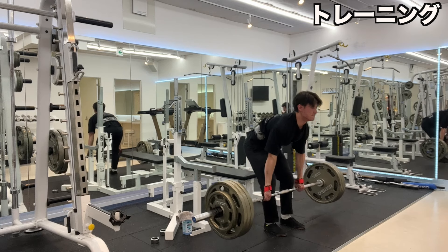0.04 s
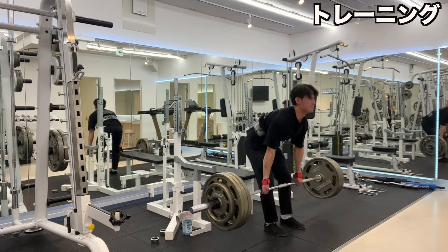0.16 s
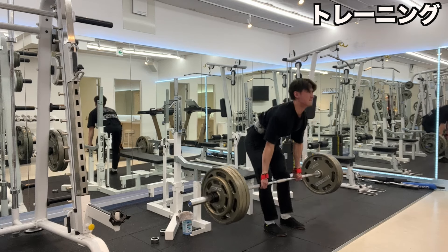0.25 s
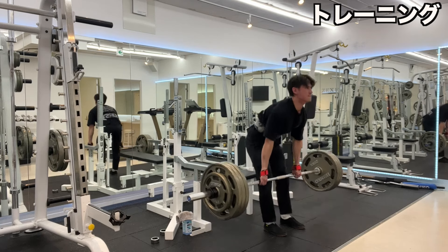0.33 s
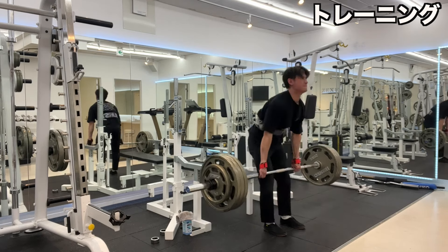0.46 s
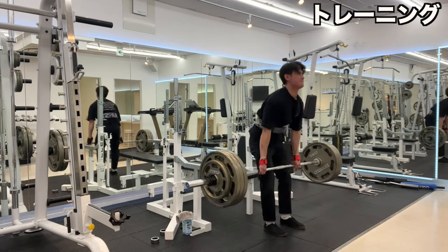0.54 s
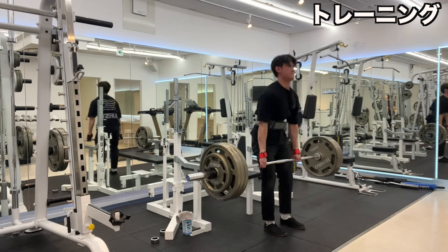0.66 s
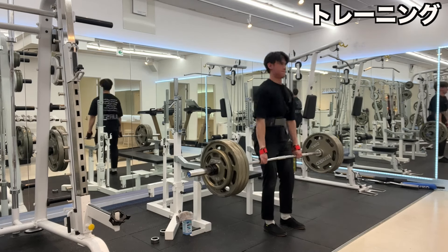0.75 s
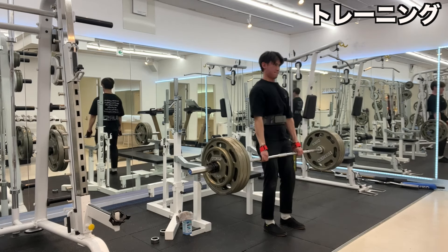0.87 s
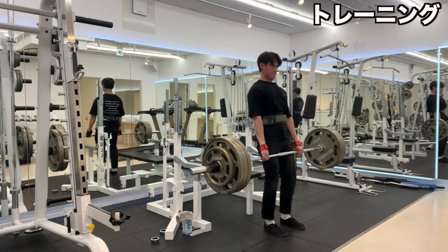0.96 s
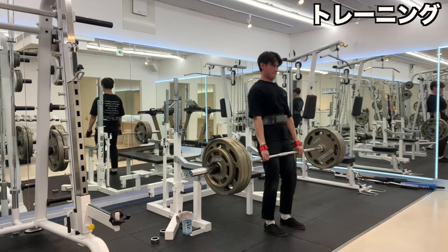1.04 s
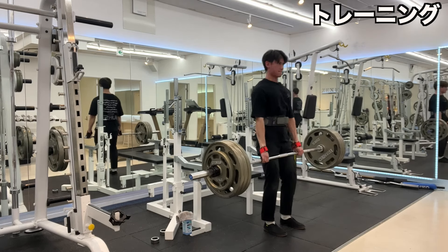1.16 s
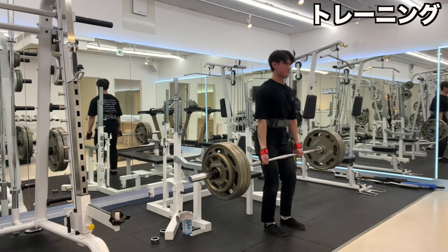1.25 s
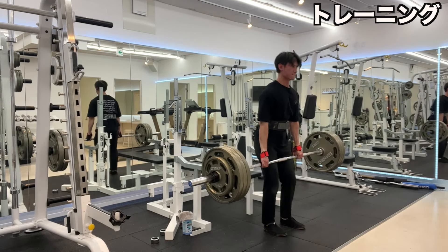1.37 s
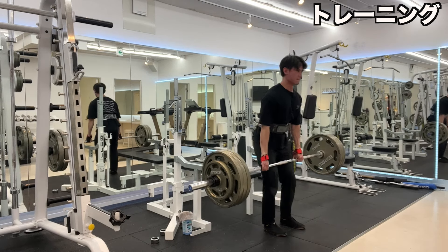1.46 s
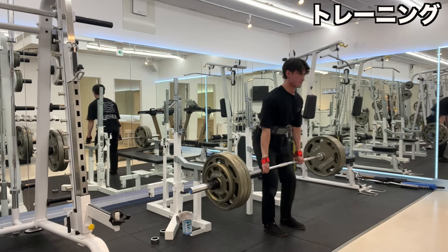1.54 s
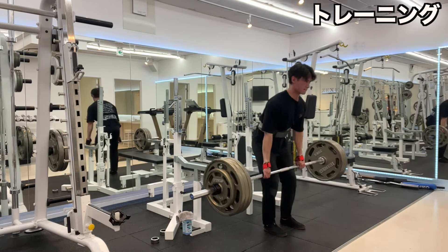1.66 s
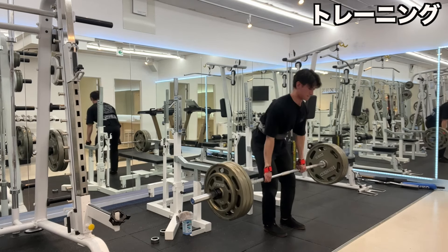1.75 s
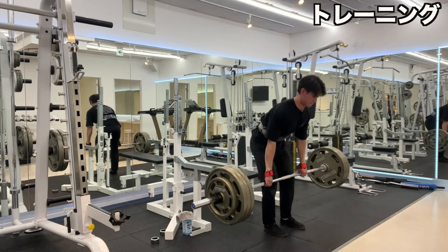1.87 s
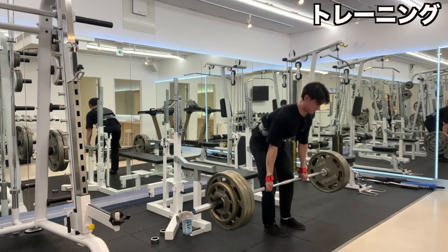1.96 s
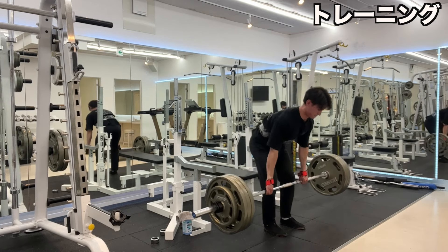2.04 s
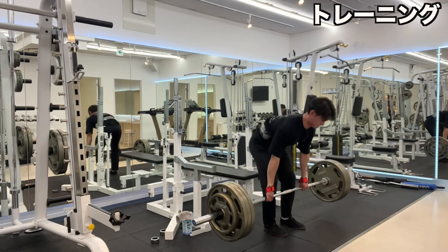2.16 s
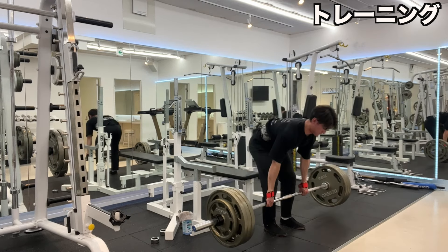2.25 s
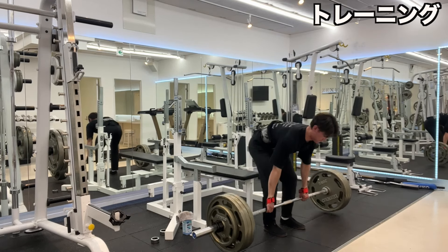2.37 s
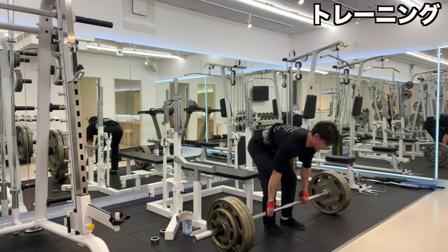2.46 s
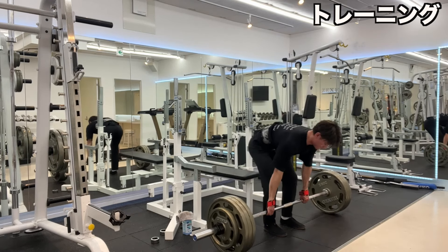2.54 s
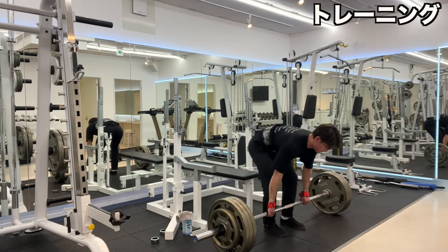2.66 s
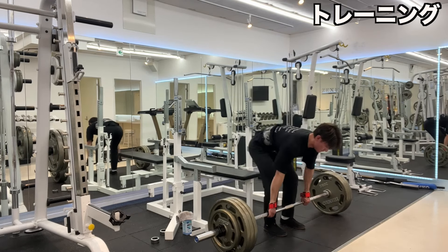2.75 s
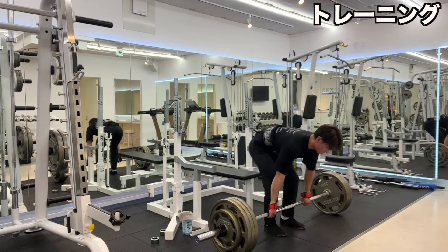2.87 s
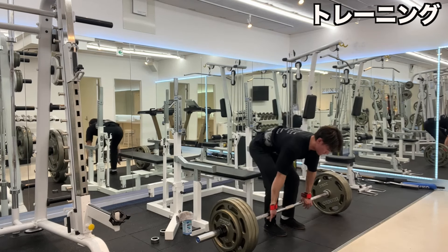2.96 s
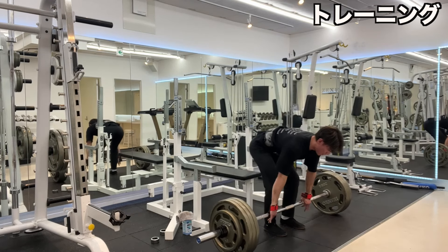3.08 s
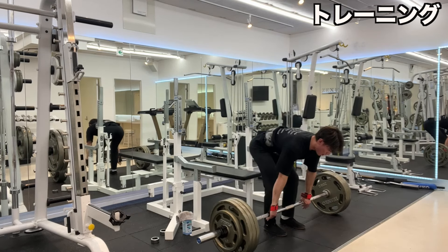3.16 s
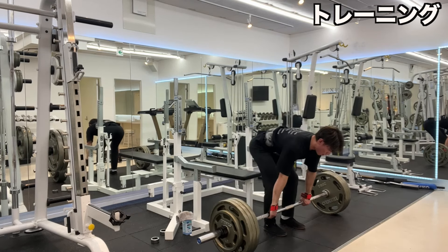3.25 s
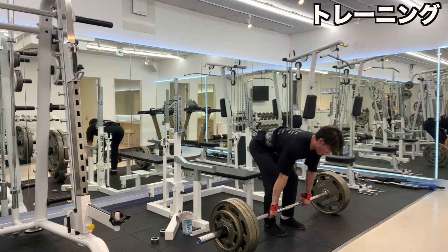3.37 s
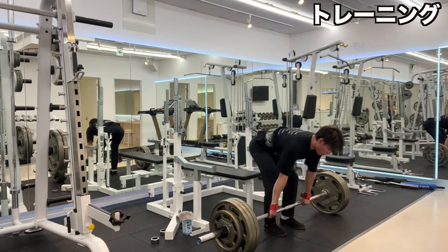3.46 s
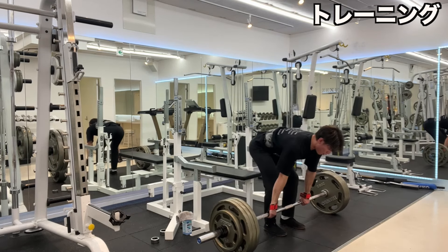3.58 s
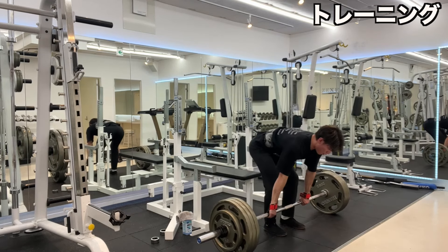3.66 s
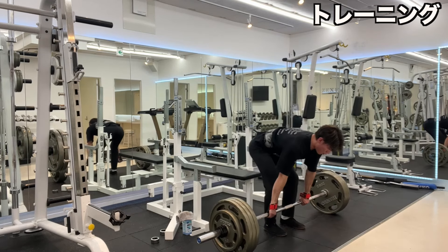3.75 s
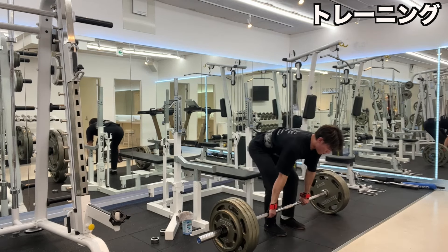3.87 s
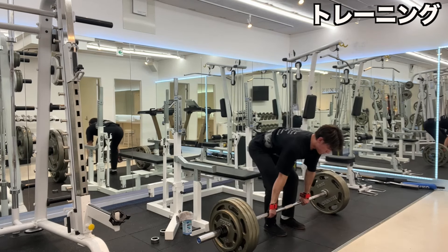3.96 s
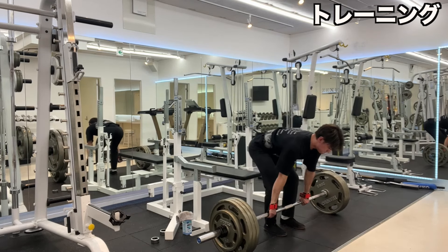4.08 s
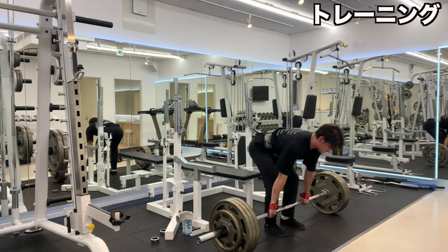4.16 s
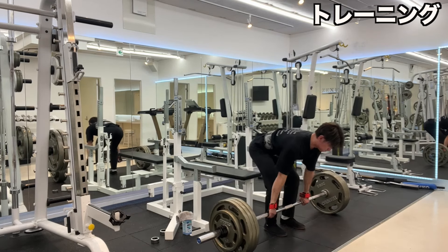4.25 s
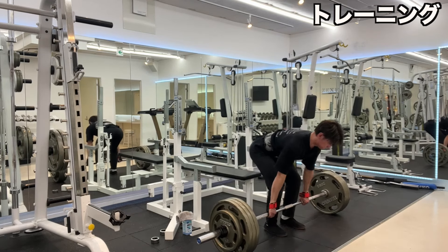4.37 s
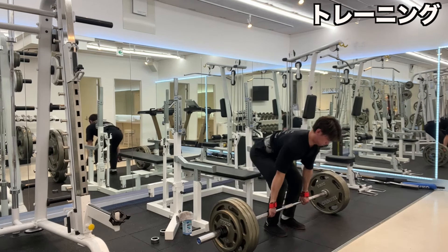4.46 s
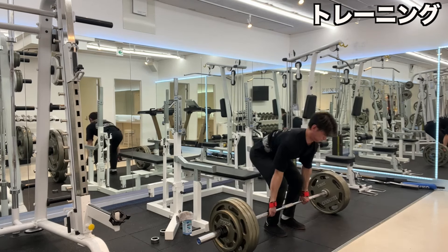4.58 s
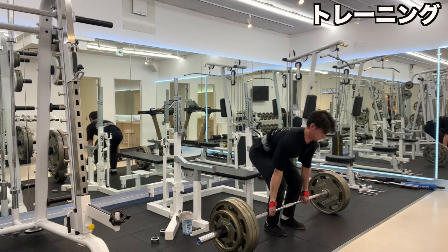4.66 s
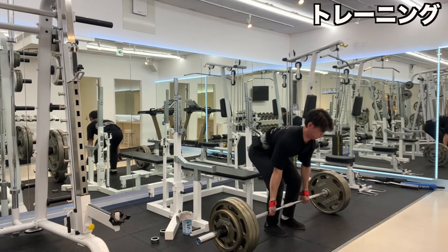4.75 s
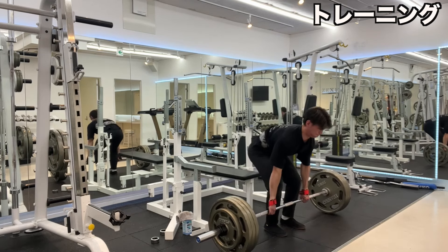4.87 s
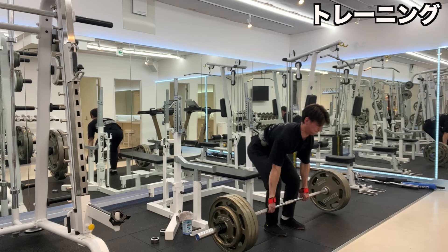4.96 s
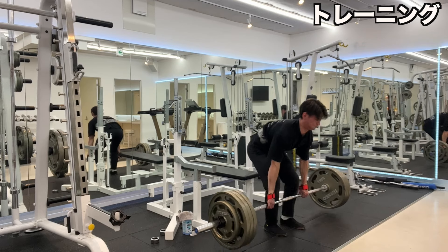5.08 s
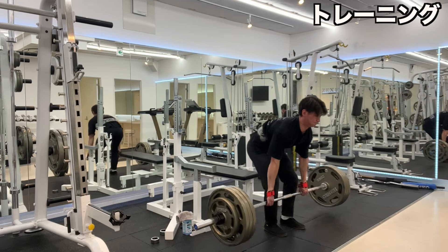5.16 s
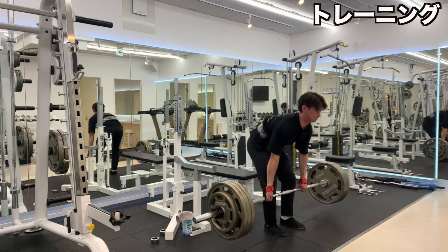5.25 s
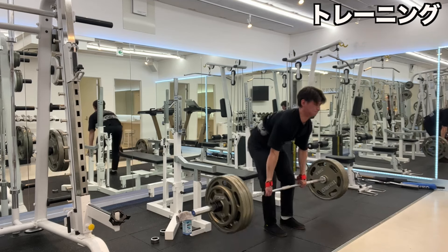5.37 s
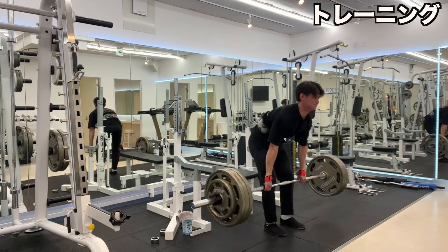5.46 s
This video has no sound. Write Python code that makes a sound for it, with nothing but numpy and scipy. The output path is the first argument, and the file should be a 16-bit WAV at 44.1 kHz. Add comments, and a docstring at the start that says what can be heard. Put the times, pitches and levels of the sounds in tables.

```python
"""Iron plates clink on a barbell's sleeves during a deadlift in a hard-walled gym: knocks ring damped sines.
The bar lands on the rubber floor in a cluster of blows: crashing noise, high modes and a low thud.
It rattles, settles and is pulled up again, with softer rebounds after the knocks.
Ventilation runs underneath: filtered noise and unsteady fan tones."""
import sys
import numpy as np
from scipy import signal
from scipy.fft import rfft, irfft, next_fast_len
from scipy.io import wavfile
from scipy.ndimage import uniform_filter1d, minimum_filter1d, map_coordinates

SR = 44100
rng = np.random.default_rng(int(sys.argv[2]) if len(sys.argv) > 2 else 0)


def store_pcm(level_fs):
    """Save levels as 16-bit WAV."""
    pcm = np.round(np.clip(level_fs, -1, 1) * 32767).astype(np.int16)
    wavfile.write(sys.argv[1], SR, np.atleast_2d(pcm).T)


N = 243431
TIME = np.arange(N) / SR
RING = np.arange(3 * SR // 4) / SR  # time within one blow, s
LIFE = len(RING)


def amp(db):
    """Decibels to gain."""
    return 10 ** (np.asarray(db) / 20)


def unit(x):
    """Scale x to rms 1."""
    return x / np.sqrt(np.mean(x ** 2) + 1e-20)


def unit_attack(x, size=4400):
    """Scale x to rms 1 over its first samples."""
    return x / np.sqrt(np.mean(x[..., :size] ** 2) + 1e-20)


def along(points, hz):
    """Interpolate (Hz, value) points on a log frequency axis."""
    point_hz, value = np.transpose(points)
    return np.interp(np.log(hz + 1), np.log(point_hz), value)


def fade(t60_s):
    """Exponential decay of 60 dB in t60_s."""
    return np.exp(-np.log(1000) * RING / t60_s)


def wobble(rate_hz):
    """Smooth random curve with rate_hz knots a second."""
    knots = rng.standard_normal(int(N * rate_hz / SR) + 4)
    return map_coordinates(knots, [TIME * rate_hz])


# left-right likeness of diffuse sound: [freq_hz, correlation]
ALIKE = [(30, 0.54), (60, 0.35), (130, 0.27), (280, 0.83), (590, 0.12), (1100, 0.15), (2000, 0.041)]


def noise(spectrum, size):
    """Diffuse stereo noise of rms 1: more alike in the bass, nearly unrelated in the treble."""
    m = next_fast_len(size)
    hz = np.fft.rfftfreq(m, 1 / SR)
    angle = np.arccos(np.clip(along(ALIKE, hz), -1, 1)) / 2
    bins = rfft(rng.standard_normal((2, m))) * amp(along(spectrum, hz))
    mid, side = irfft(bins * [np.cos(angle), np.sin(angle)], m)[:, :size]
    return unit(np.array([mid + side, mid - side]))


def add(track, start_s, sound):
    """Mix a sound into the track from start_s."""
    start = max(round(start_s * SR), 0)
    track[:, start:start + sound.shape[1]] += sound[:, :N - start]


def partials(modes):
    """One damped sine for each (freq_hz, level_db, t60_s)."""
    waves = [amp(db) * np.sin(2 * np.pi * hz * RING) * fade(t60_s) for hz, db, t60_s in modes]
    return np.array(waves, np.float32)


def strike(waves, scatter_db):
    """A blow drives the modes at random strengths and signs."""
    signs = rng.choice([-1, 1], len(waves))
    strengths = amp(scatter_db * rng.standard_normal(len(waves))) * signs
    return np.tensordot(np.float32(strengths), waves, 1)


def chatter(rate_hz, depth_db):
    """Uneven force of iron rattling on iron, rate_hz changes a second."""
    return amp(depth_db * np.interp(RING * rate_hz, np.arange(400), rng.standard_normal(400)))


# colour of the reflections: [freq_hz, level_db]
WALLS = [(300, 1.5), (5000, -5.5)]


def room(x, t60_s, wet_db, early_db, early_t60_s, left_delay=4):
    """Direct sound, left_delay samples later on the left, plus early reflections and the hall's tail."""
    early = amp(early_db) * unit(fade(early_t60_s))
    tail = amp(wet_db) * unit(fade(t60_s))
    response = np.hypot(early, tail) * noise(WALLS, size=LIFE) / np.sqrt(LIFE)
    response[0, left_delay] += 1
    response[1, 0] += 1
    return signal.fftconvolve(x[:, None], np.float32(response[None]), axes=2)[..., :LIFE]


def ringing(modes, count=3):
    """Modes through the room at count places of the bar; reflections make each one flutter."""
    places = [room(partials(modes), t60_s=0.65, wet_db=-3, early_db=-1, early_t60_s=0.15)
              for _ in range(count)]
    return np.array([[np.float32(amp(db)) * unit_attack(wave) for wave, (_, db, _) in zip(place, modes)]
                     for place in places])


# plate against plate or sleeve: [start_s, level_db (relative), hardness_db, build_up_s (time constant)]
CONTACTS = [(0.0, -40.5, 2, 0.001), (0.080, -34, -2, 0.0055), (0.255, -46.5, -14.5, 0.0035),
            (0.557, -44, -11, 0.003), (0.642, -33.5, -5, 0.0027), (0.689, -34, 7, 0.0018),
            (0.887, -54, -34, .012), (1.283, -50.5, -13, 0.0048), (1.403, -48.5, -35, 0.00092),
            (1.868, -46, -14, .002), (1.970, -39, 5, 0.0067), (2.040, -51.5, 11, 0.00069),
            (2.387, -37, -2, 0.005), (2.418, -14, -9, 0.00089), (2.443, -24, 15, 0.0035),
            (2.588, -18.5, -2.5, 0.014), (2.70, -22.5, -1.5, 0.0035), (2.82, -34.5, -1.5, 0.03),
            (2.912, -32.5, 1.5, 0.035), (2.96, -39.5, -12, 0.018), (3.032, -29.5, 3.5, 0.0011),
            (3.186, -33.5, 1, 0.013), (3.27, -36, 3, 0.002), (3.637, -34.5, -4, 0.017),
            (3.668, -34.5, -2, 0.0055), (3.85, -53, -27.5, .008), (4.263, -48.5, -9, .002),
            (4.385, -37, -5, 0.0029), (4.413, -33, -4.5, 0.0026), (4.546, -34.5, -8, 0.0027),
            (4.710, -41.5, -4, 0.0069), (4.748, -42.5, -0.5, 0.0074), (4.806, -36, -10.5, 0.012),
            (4.912, -38.5, -2.5, 0.02), (4.972, -28, 9, 0.00068), (5.043, -39, -5, .002),
            (5.148, -37, -7.5, 0.0047), (5.270, -34.5, -5, 0.0015), (5.297, -40.5, 10, 0.0042),
            (5.361, -35.5, 2, .001)]
# iron's answer by hold of the bar: [(big_db, standing_db, small_db), (four mode families, low to high, db),
# clack_re_ring_db, damping_t60_s (added by hands and neighbours), rebound_re_knock_db]
HANGING = ((0, -13, -27.5), (-10.5, -2.5, 0.5, -22), -6.5, 2.2, -12)
LANDING = ((0, 7, 8), (-11, 1.5, -.5, -15.5), -1, 1.2, -8)
ROCKING = ((0, 3.4, -8), (-5, -1, -3.5, -26), -7.5, 1.35, -11.5)
GRIPPED = ((0, -3.5, 1.3), (-3.5, -1, -7.5, -26), -6, 1.3, -12.5)
PULLED = ((0, -5.5, 1.7), (-9.5, 0, -1.5, -14.5), 0.5, 3.8, -10.5)
LIFT_OFF = ((0, 0, 10.6), (-8.5, 0.5, -1, -17), -5.5, 4.1, -9)
# hold of the bar over time: [start_s, hold]
STAGES = [(0, HANGING), (2.3, LANDING), (2.85, ROCKING), (4.3, GRIPPED), (4.73, PULLED), (4.96, LIFT_OFF),
          (5.1, PULLED), (5.22, HANGING)]
# a loose plate swings back and touches once more
REBOUND_S, REBOUND_SPREAD_S, REBOUND_RISE_S = .062, .006, .006


def knocks():
    """Every contact and its softer rebound, with the hold of the bar at that moment."""
    for (start_s, db, hard_db, build_up_s), luck in zip(CONTACTS, rng.standard_normal(len(CONTACTS))):
        *hold, rebound_db = [hold for from_s, hold in STAGES if from_s <= max(start_s, 0)][-1]
        yield start_s, db, hard_db, build_up_s, hold
        rebound_s = start_s + REBOUND_S + REBOUND_SPREAD_S * luck
        yield rebound_s, db + rebound_db, hard_db, REBOUND_RISE_S, hold


# modes of big plates hanging free: [freq_hz, level_db, t60_s (before damping)]
BIG = [(597, -8.5, 0.38), (645.4, -2, 0.12), (711.7, -5, 0.32), (950, -4, 0.95), (986.6, 4, 0.41),
       (1137.6, 0.5, 0.17), (1655, 3, 0.22), (1760, 0, 0.44), (1702, 9, 0.24), (2508, -13, 0.52),
       (2677, -11, 0.39), (2688, -8, 0.31), (3570, -20.5, 0.19), (3800, -27.5, 0.31)]
# modes of plates standing on the floor: [freq_hz, level_db, t60_s (before damping)]
STANDING = [(393.2, -6, 0.99), (524.2, 1.5, 0.39), (578, 5, 0.36), (995, 7.5, 0.39), (1044.5, 5.5, 0.31),
            (1206, -3, 0.24), (1777, -7.5, 0.43), (1724, -1.5, 0.26), (1971, -7, 0.56), (2110, -12.5, 0.2),
            (2785, -8.5, 0.37), (2905, -13.5, .45)]
# modes of small outer plates: [freq_hz, level_db, t60_s (before damping)]
SMALL = [(1101, -0.5, .45), (1161, 5.5, 0.17), (1810, 7, 0.65), (1849, 2.5, 1.3), (1928, 5, 0.43),
         (2064, -3, 0.35), (2087, -14, 0.36), (2820, -8, 0.42), (2920, -5, 0.45), (3040, -6.5, 0.17),
         (3830, -22, 0.49), (4000, -28.5, 0.34), (4240, -17, 0.41)]
# dense, quickly damped modes of the stack: [freq_hz, density_db_per_hz]
CLACK = [(350, -26), (560, 1.5), (800, -3.5), (1050, 12.5), (1230, 1), (1480, -14.5), (1700, 10.5),
         (2050, -14), (2300, -14.5), (2750, -7), (3250, -27), (3800, -23.5), (5000, -38), (7000, -50)]
# mode family bands: [low_hz, high_hz]
FAMILIES = [(370, 850), (850, 1400), (1450, 2300), (2350, 4600)]
# share of hardness_db each family takes up, so hard knocks are brighter: [share]
HARDNESS = [-.1, -0.065, 0.39, 0.73]
SPEAK_S = .003  # start lead: a family takes a few cycles to speak


def plates():
    """Knocks clack, chatter and ring the iron; hardness and the hold of the bar set the colour."""
    out = np.zeros((2, N))
    irons = [ringing(BIG), ringing(STANDING), ringing(SMALL)]
    bands = [signal.butter(3, edges, "bandpass", fs=SR, output="sos") for edges in FAMILIES]
    for k, (start_s, db, hard_db, build_up_s, hold) in enumerate(knocks()):
        irons_db, families_db, clack_db, damping_t60_s = hold
        # knock and rebound share a place on the bar
        ring = sum(gain * strike(iron[k // 2 % len(iron)], scatter_db=3.0)
                   for gain, iron in zip(amp(irons_db), irons))
        # short clack, carried on by chatter and the room's echo
        force = fade(0.07) + amp(-5) * fade(0.72) * chatter(rate_hz=80, depth_db=3.5)
        clack = amp(clack_db) * unit_attack(noise(CLACK, size=LIFE) * force)
        rise = 1 - np.exp(-RING / build_up_s)
        contact = (unit_attack(ring) + clack) * fade(damping_t60_s) * rise
        for band, family_db, share in zip(bands, families_db, HARDNESS):
            family = unit_attack(signal.sosfilt(band, contact))
            add(out, start_s - SPEAK_S, amp(db + family_db + share * hard_db) * family)
    return out


# duct rush: [freq_hz, density_db_per_hz (relative)]
AIR = [(20, -23.5), (33, -6), (55, -5.5), (110, -10), (160, -10.5), (260, -9.5), (420, -17.5), (700, -16.5),
       (1100, -27), (1800, -35), (3000, -42), (6000, -48), (12000, -50)]
# fan tones: [pitch_hz, level_db (mean, before stereo balance)]
HUM = [(107.6, -59), (215.3, -72), (360.7, -71)]
HUM_WAVER_DB, HUM_DRIFT_RAD = 1.5, .3  # random level and phase spread


def ventilation():
    """Duct rush as shaped noise, with fan tones slightly unsteady in level and phase."""
    hum = np.zeros(N)
    for hz, db in HUM:
        level = amp(db + HUM_WAVER_DB * wobble(1.5)) * np.sqrt(2)
        hum += level * np.sin(2 * np.pi * hz * TIME + HUM_DRIFT_RAD * wobble(2.4))
    return amp(-56.5) * noise(AIR, size=N) + hum * amp([[1.2], [-1.2]])


# strongest high modes of the plates: [freq_hz, level_db (used relative to the strongest)]
HIGH = [(2724, -43.5), (3488, -52.5), (3962, -43), (4506, -61.5), (4877, -58.5), (5163, -56.5),
        (5712, -56.5), (6670, -62.5), (8166, -72.5), (8683, -69)]
HIGH_DB, HIGH_T60_S = -12.5, 1  # level within the crash, decay


def singing(count=3):
    """High modes outlast the crash, each a close cluster: one for every plate of the stack."""
    top_db = max(db for _, db in HIGH)
    return partials([(hz * (1 + 0.0015 * rng.standard_normal()), db - top_db, HIGH_T60_S)
                     for hz, db in HIGH for _ in range(count)])


# crash of the plates: [freq_hz, density_db_per_hz (relative)]
CRASH = [(1200, -30.5), (2000, -10.5), (2450, -16.5), (2780, -30.5), (3300, -11.5), (4340, -14),
         (4900, -17), (7400, -25), (10000, -28), (12500, -28.5), (13500, -32)]


def overtones(lo_hz, hi_hz, t60_s, count=64):
    """Many high plate modes, roughly evenly spread in log frequency; higher ones die sooner."""
    position = (np.arange(count) + rng.random(count)) / count
    hz = lo_hz * (hi_hz / lo_hz) ** position
    return partials(zip(hz, 0.2 * along(CRASH, hz), t60_s * (lo_hz / hz) ** 1.3))


# hard blows of landing and settling: [start_s, crash_db, thud_db]
BLOWS = [(2.412, -30, -29.5), (2.422, -25, -42.5), (2.441, -32, -52), (2.47, -61, -66), (2.592, -32, -50.5),
         (2.611, -32.5, -44.5), (2.684, -36, -43.5), (3.031, -59.5, -84)]
# floor thud: [freq_hz, density_db_per_hz (relative)]
THUD = [(22, -15), (35, -6), (70, 1.5), (110, -1.5), (165, 5.5), (240, -1), (340, -5.5), (600, -13),
        (1200, -36.5)]
# the floor's long rumble: [freq_hz, density_db_per_hz (relative)]
SLAB = [(18, 9), (33, 11), (48, -10.5), (68, 10), (110, -7.5), (250, -64)]


def landing():
    """Plates crash together as the rims hit the mat; the floor thuds and rumbles on."""
    out = np.zeros((2, N))
    rise = 1 - np.exp(-RING / 0.00066)
    high = overtones(lo_hz=3152, hi_hz=11850, t60_s=0.8)
    strong = singing()
    for start_s, crash_db, thud_db in BLOWS:
        spray_decay = fade(0.2) + amp(-4.5) * fade(0.75)
        spray = noise(CRASH, size=LIFE) * spray_decay * chatter(rate_hz=130, depth_db=3.0)
        zing = np.array([strike(high, scatter_db=4), strike(high, scatter_db=4)])
        song = np.array([strike(strong, scatter_db=2), strike(strong, scatter_db=0.5)])
        clash = .85 * unit_attack(spray) + .55 * unit_attack(zing) + amp(HIGH_DB) * unit_attack(song)
        # a softer blow lasts longer and so sounds duller
        edge_hz = np.clip(16000 * amp(0.19 * (crash_db + 14.5)), 1000, 18000)
        crash = signal.sosfilt(signal.butter(2, edge_hz, fs=SR, output="sos"), clash)
        thud = noise(THUD, size=LIFE) * rise * (fade(0.084) + amp(-16.5) * fade(0.81))
        add(out, start_s, amp(crash_db) * rise * crash + amp(thud_db) * unit_attack(thud))
    rumble_decay = amp(-60 * TIME / 3)  # t60 3 s
    rumble = noise(SLAB, size=N).mean(0) * rumble_decay * np.minimum(TIME / .015, 1)
    add(out, BLOWS[0][0], amp(-43.5) * np.array([rumble, rumble]))
    return out


def scene():
    """Barbell, balanced slightly to the right, over the ventilation."""
    return (plates() + landing()) * amp([[-.3], [.3]]) + ventilation()


TOP_HZ = 13200  # upper band limit


def record(dry):
    """A limiter smoothly holds down the loudest peaks; a steep low-pass ends the band at TOP_HZ."""
    needed_gain = np.minimum(1, .8 / (np.abs(dry).max(0) + 1e-9))
    held = dry * uniform_filter1d(minimum_filter1d(needed_gain, size=441), size=441)
    m = next_fast_len(N + SR // 2)
    hz = np.fft.rfftfreq(m, 1 / SR)
    return irfft(rfft(held, m) / np.sqrt(1 + (hz / TOP_HZ) ** 120), m)[:, :N]


dry = scene()
out = record(dry)
store_pcm(out)
```